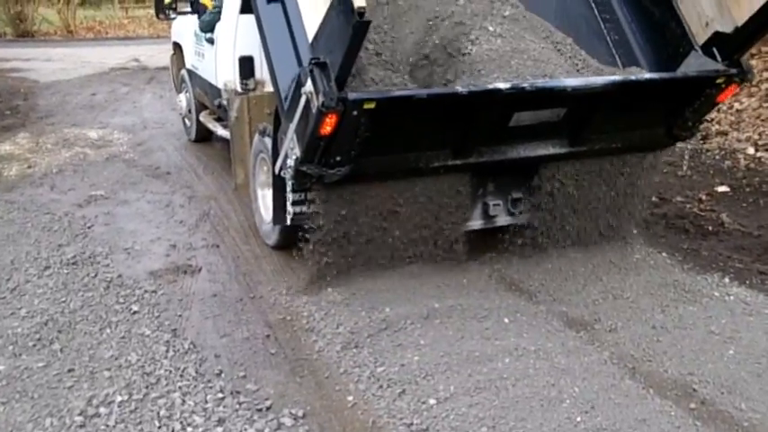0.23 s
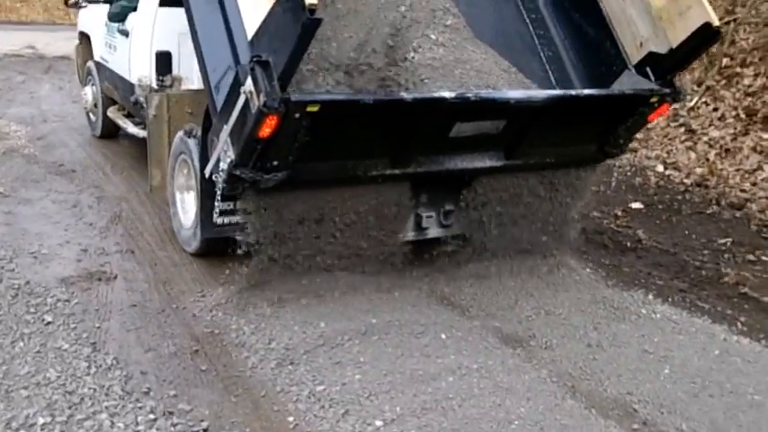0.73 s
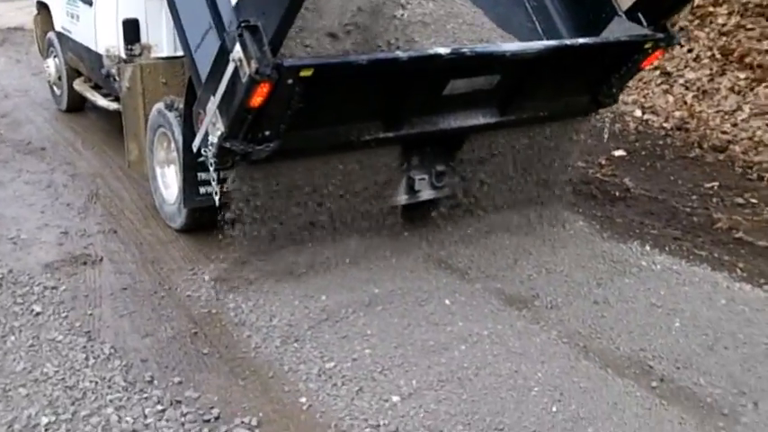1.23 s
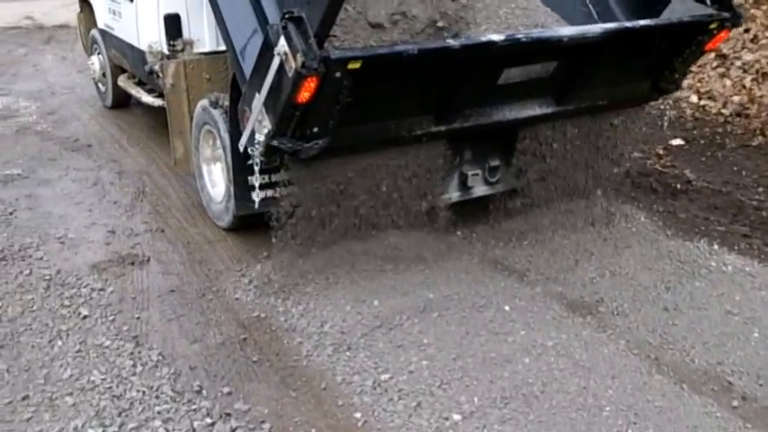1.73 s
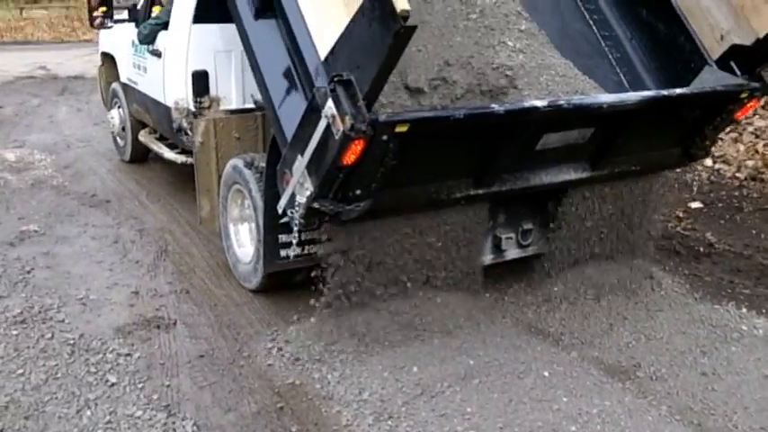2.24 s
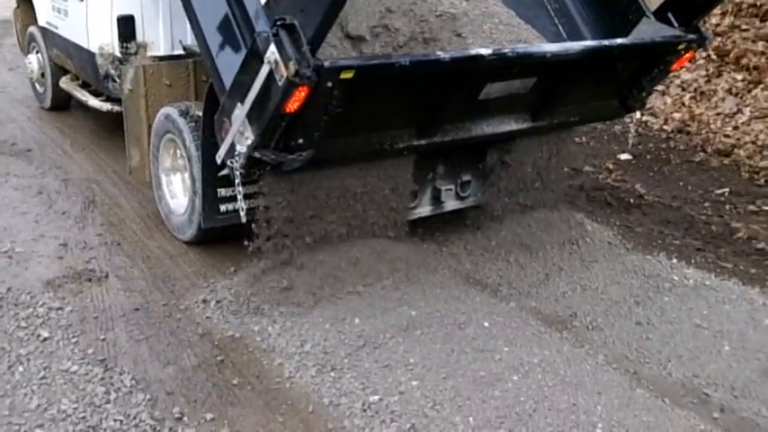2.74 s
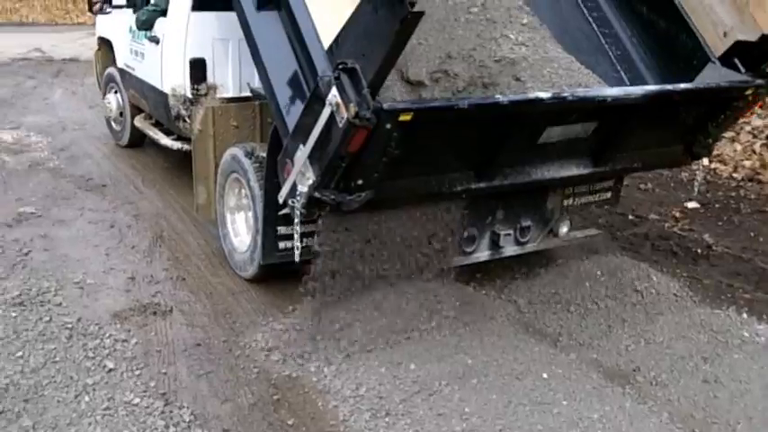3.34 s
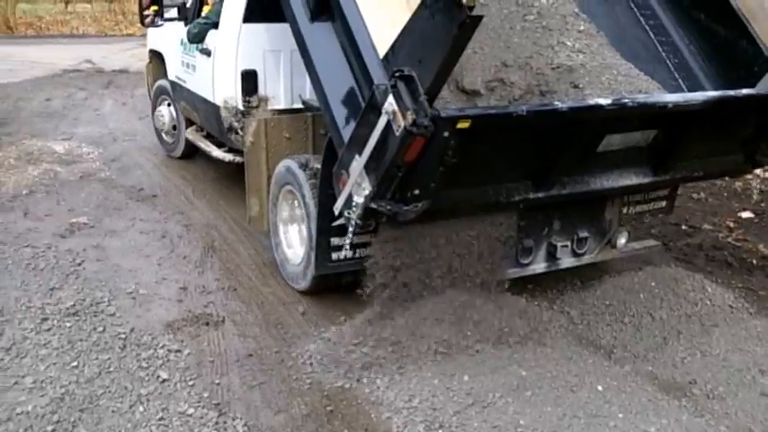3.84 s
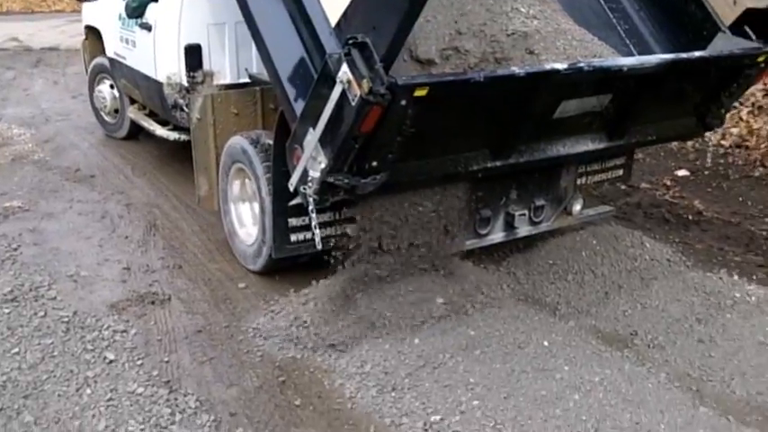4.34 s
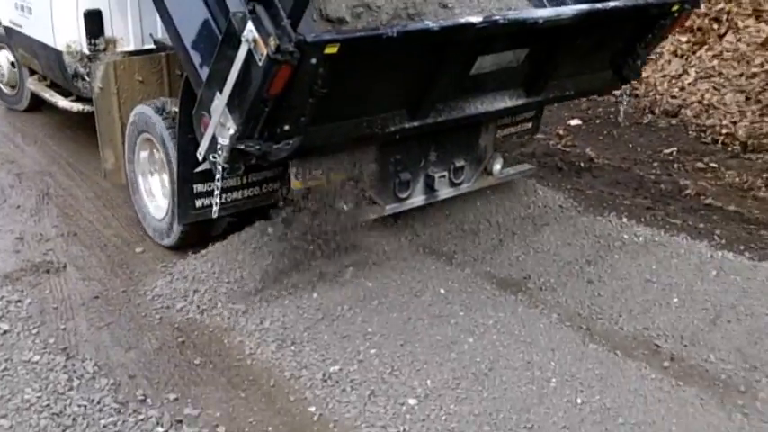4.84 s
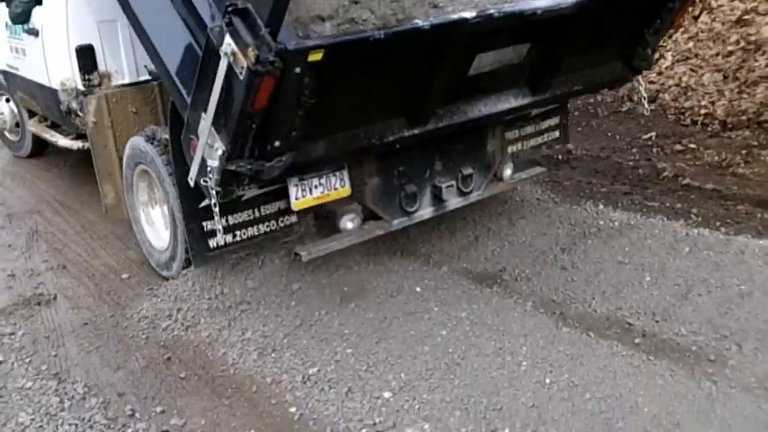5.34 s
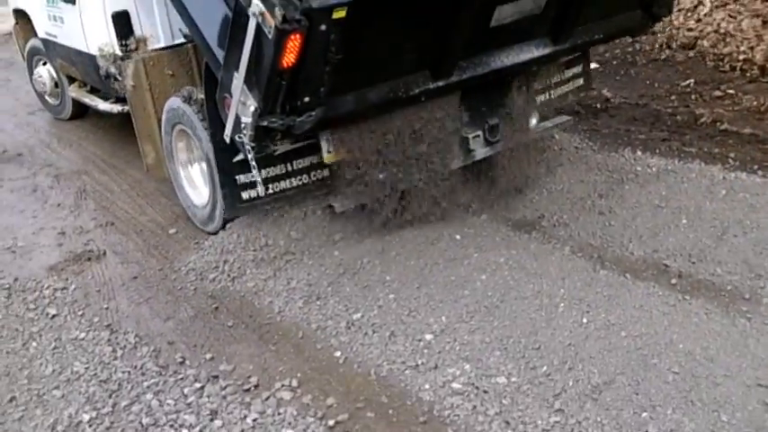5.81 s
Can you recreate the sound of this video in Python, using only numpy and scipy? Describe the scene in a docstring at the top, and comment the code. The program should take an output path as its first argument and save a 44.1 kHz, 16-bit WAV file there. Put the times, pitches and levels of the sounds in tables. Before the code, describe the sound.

A steady bright rush of gravel, full of ticks and knocks, runs over a quiet, throbbing truck engine in the open. The rush gradually weakens; the engine swells once, eases, then swells higher. Steel clanks and hollow clonks join a faint high squeal. After a brief near-lull with dull earthy thumps, a burst of coarse stone strikes the hitch plate and clatters on. The microphone is a few metres away, with barely any echo.

```python
"""Crushed stone clatters out from under a dump truck's tailgate, a few metres away outdoors.
The flow thins, then a last load breaks loose; random contacts ring short modes over a hiss of grit.
Behind it a V8 idles, then revs twice to creep forward: harmonics of the engine cycle and puffs of noise.
A thin squeal of wavering sine partials comes up; steel parts clank as sums of damped sines."""
import sys
import numpy as np
from scipy import signal
from scipy.fft import rfft, irfft, next_fast_len
from scipy.io import wavfile

SR = 44100
rng = np.random.default_rng(int(sys.argv[2]) if len(sys.argv) > 2 else 0)


def to_wav(sig):
    """Store sig (one row per channel, or 1-D mono) as 16-bit WAV at the path in sys.argv[1].

    Samples outside -1..1 are clipped; the rate is SR.
    """
    pcm = np.clip(np.atleast_2d(sig), -1, 1) * 32767
    pcm = np.round(pcm).astype(np.int16)
    wavfile.write(sys.argv[1], SR, pcm.T)  # frames by channels


N = 267687

# stone running under the tailgate: t/s, flow level/dB
STONE_FLOW = [(0, 0.6), (1.9, -0.6), (2.6, -2.1), (3.1, -4), (4.13, -3.5), (4.3, -3), (4.55, -5), (4.8, -4),
              (5.2, -7.5), (5.45, -11.5), (5.54, -0.5), (5.85, -6), (6.07, -1.5)]
# modes of the steel tailgate: f/Hz, width/Hz, relative level/dB
TAILGATE_MODES = [(330, 40, -21), (1490, 17, -4), (2104, 42, -2), (2602, 39, 4.5), (3107, 42, -2.5)]


def from_db(db):
    """Decibels to gain."""
    return 10 ** (np.asarray(db) / 20)


def rms_one(x):
    """Scale to unit power."""
    return x / np.sqrt(np.mean(x ** 2) + 1e-20)


def in_time(rows):
    """Each column of a curve at every sample."""
    s, *columns = np.transpose(rows)
    return [np.interp(np.arange(N) / SR, s, c) for c in columns]


def at_hz(points, hz):
    """Read a spectrum on a log-frequency axis."""
    f, db = np.transpose(points)
    return np.interp(np.log(np.maximum(hz, 1)), np.log(f), db)


def drift(rate):
    """Slow random wander with spread 1: low-passed noise, made at 1/40 of the sample rate."""
    step, settle = 40, 2000
    r = np.exp(-2 * step * np.pi * rate / SR)
    noise = rng.standard_normal(N // step + settle + 2)
    slow = rms_one(signal.lfilter([1], [1, -2 * r, r * r], noise)[settle:])
    return np.interp(np.arange(N) / step, np.arange(len(slow)), slow)


def colour(x, spectrum):
    """Causal (minimum-phase) filter with the given spectrum, by folding its cepstrum."""
    size = 2 * next_fast_len(len(x))
    gain = from_db(at_hz(spectrum, np.fft.rfftfreq(size, 1 / SR)))
    cepstrum = irfft(np.log(gain))
    cepstrum[1:size // 2] *= 2
    cepstrum[size // 2 + 1:] = 0
    return irfft(rfft(x, size) * np.exp(rfft(cepstrum)))[:len(x)]


def resonate(x, hz, width):
    """One resonance with gain 1 at its top."""
    r = np.exp(-np.pi * width / SR)
    zeros = np.array([1, 0, -1]) * (1 - r * r) / 2
    poles = [1, -2 * r * np.cos(2 * np.pi * hz / SR), r * r]
    return signal.lfilter(zeros, poles, x + 1e-18)


def impacts(per_s, spread_db, largest=6.2):
    """Random clicks: a positive spread makes a few large ones, a negative spread a few small ones."""
    born = np.flatnonzero(rng.random(N) < per_s / SR)
    sizes = rng.exponential(1, len(born))
    signs = rng.choice([-1, 1], len(born))
    clicks = np.zeros(N)
    clicks[born] = signs * from_db(spread_db * np.minimum(sizes, largest))
    return clicks


def engine(boom_db=0.0, idle_rumble_db=3.5, revved_rumble_db=0.0, flutter=0.17, throb=0.85):
    """Firing tone and side tones shift balance with speed; a turbulent growl grows with speed and load."""
    # engine speed: t/s, firings per s
    speed = [(0, 35.6), (2.25, 35.9), (2.74, 37.2), (2.94, 39.3), (3.13, 43), (3.3, 49.5), (3.57, 60.8),
             (3.68, 61), (3.9, 55.3), (4.05, 54.3), (4.35, 56.3), (4.5, 64), (4.63, 73.8), (4.8, 79.3),
             (4.9, 81), (5.06, 77.2), (5.26, 64), (5.58, 53.6), (6.07, 53.7)]
    # engine load, heard as the boom of the firing tone: t/s, level/dB
    load = [(0, -42.5), (2.2, -38), (2.95, -34.5), (3.33, -33.5), (3.44, -30.5), (3.7, -27.5), (4.0, -32.5),
            (4.5, -24.5), (4.62, -29.5), (4.95, -30), (5.22, -32.5), (5.37, -30.5), (5.56, -35), (5.7, -33),
            (6.07, -34.5)]
    # the two banks fire unevenly, so harmonics of the engine cycle flank the firing tone
    # multiple of the cycle: idling level/dB, creeping level/dB, revved level/dB, all at the usual load
    exhaust_tones = {"3": (-62, -50, -47), "5": (-50.5, -40.5, -36), "6": (-64, -57, -54),
                     "7": (-50.5, -51.5, -56), "9": (-60, -60, -43), "10": (-59, -64, -46),
                     "11": (-46.5, -57, -35), "13": (-46.5, -40, -51), "14": (-52, -53, -48),
                     "16": (-43, -48, -39), "19": (-47, -61, -46), "20": (-52, -60, -52),
                     "21": (-40.5, -47, -48), "24": (-47, -50, -55), "29": (-62, -54, -59)}
    # speeds of those three states: firings per s
    state_speeds = (36, 57, 74)
    # colour of the exhaust turbulence: f/Hz, level/dB
    rumble_colour = [(20, -64), (50, -36), (100, -15), (130, -2), (175, 3), (235, -2.5), (290, -5.5),
                     (380, -20.5), (600, -21.5), (1500, -97.5)]
    cylinders = 8
    usual_load_db, tones_follow_load = -34.5, 0.75
    silencer_hz, silencer_width_hz = 126, 12.4
    pipe_hz, pipe_width_hz, pipe_db = 174.5, 23, -1.5
    # reference point of the growl, before the rumble trim
    idle_firings, idle_load_db, idle_growl_db = 38.3, -41.5, -54.5
    growl_db_per_octave, growl_follows_load = 13.5, 0.22

    firings, = in_time(speed)
    boom, = in_time(load)
    angle = 2 * np.pi * np.cumsum(firings / cylinders) / SR
    tones = np.zeros(N)
    for name, levels in exhaust_tones.items():
        k = int(name)
        # overtones of the firing tone keep step with it, so that each puff has a steep front
        phase = 2 * np.pi * rng.random() * (k % cylinders != 0)
        level = from_db(np.interp(firings, state_speeds, levels))
        tones += level * (1 + flutter * drift(2.4)) * np.sin(k * angle + phase)
    # the silencer cancels a narrow band
    tones -= resonate(tones, silencer_hz, silencer_width_hz)
    tones *= from_db(tones_follow_load * (boom - usual_load_db))

    # turbulent gas leaves in puffs, one a firing, and rings the exhaust pipe
    puffs = rng.standard_normal((2, N)) * (1 + throb * np.cos(cylinders * angle))
    pipe = resonate(resonate(puffs[1], pipe_hz, pipe_width_hz), pipe_hz, 2 * pipe_width_hz)
    rumble = rms_one(colour(puffs[0], rumble_colour)) + from_db(pipe_db) * rms_one(pipe)
    growl_db = idle_growl_db + growl_db_per_octave * np.log2(firings / idle_firings)
    growl_db += growl_follows_load * (boom - idle_load_db)
    rumble_db = np.interp(firings, [firings.min(), firings.max()], [idle_rumble_db, revved_rumble_db])

    firing_tone = from_db(boom + boom_db) * np.sin(cylinders * angle)
    return np.sqrt(2) * (firing_tone + tones) + from_db(growl_db + rumble_db) * rumble


def squeal(swell_db=0.5, flicker_db=2.0, level_db=-0.5):
    """Thin metal squeal, perhaps a dragging brake: four voices swell in turn and waver."""
    # partials of each voice at full pitch: f/Hz, relative level/dB
    low = [(953.5, -55.5), (1324, -58.5), (1907, -49.5)]
    middle = [(2126, -41.5)]
    top = [(4252, -52.5), (6660, -66)]
    thin = [(5720, -57.5)]
    # each swell builds slowly, then dies fast: voice, loudest at t/s, relative level/dB, build/(dB per s)
    voice_swells = [("low", 2.9, -2.5, 0.83), ("low", 5.2, 2, 17), ("low", 5.12, 1, 3.1),
                    ("middle", 2.2, -9, 3.4), ("middle", 5.4, -1.8, 3), ("middle", 5.29, -4.5, 2.8),
                    ("top", 2.76, 0, 0.86), ("top", 4.1, -1, 3.9), ("top", 5.33, -0.5, 6.3),
                    ("thin", 2.7, -1, 2), ("thin", 4.26, -1, 6)]
    # pitch creeps up as the truck moves off and sags as it stops: t/s, share of full pitch
    pitch_curve = [(0, .993), (2.6, .994), (3.8, .999), (4.4, .998), (5, 1.001), (5.25, .999), (5.42, .991),
                   (6.07, .98)]
    release_db_per_s = 99
    pitch_wander = 0.00062  # share of full pitch

    out, t = np.zeros(N), np.arange(N) / SR
    for name, partials in (("low", low), ("middle", middle), ("top", top), ("thin", thin)):
        level = np.max([db - np.maximum(build * (s - t), release_db_per_s * (t - s))
                        for voice, s, db, build in voice_swells if voice == name], axis=0)
        pitch, = in_time(pitch_curve)
        clock = np.cumsum(pitch + pitch_wander * drift(26.3)) / SR
        for hz, db in partials:
            waver = swell_db * drift(4.5) + flicker_db * drift(9.8)
            out += from_db(level + db + waver) * np.sin(2 * np.pi * hz * clock)
    return from_db(level_db) * np.sqrt(2) * out


def yard(x, echo_db=-21.5):
    """Dull reflections from the ground and the truck body."""
    dull = signal.sosfilt(signal.butter(1, 4000, fs=SR, output="sos"), x)
    delays_s = (.0043, .0091, .017)
    echoes = sum(np.pad(dull, (int(s * SR), 0))[:N] for s in delays_s)
    return x + from_db(echo_db) * echoes


def clang(hits, modes, contact_s, uneven_db=-0.5):
    """Each blow sets every mode of a steel part ringing, with a strength of its own."""
    out, t = np.zeros(N + SR), np.arange(SR // 4) / SR
    for s, hit_db in hits:
        start = int(s * SR)
        for hz, width, db in modes:
            swing = np.sin(2 * np.pi * (hz * t + rng.random()))
            swing *= np.exp(-np.pi * width * t) * (1 - np.exp(-t / contact_s))
            level_db = hit_db + db + uneven_db * rng.standard_normal()
            out[start:start + len(t)] += from_db(level_db) * swing
    return out[:N]


def steelwork(gate_db=3.5, clonk_db=7.5, hitch_db=2.0):
    """Damped modes of struck steel: the gate clanks, something hollow clonks, the hitch plate rings."""
    # the hanging tailgate clanks against the stone: t/s, relative level/dB
    gate_hits = [(3.552, -34.5), (3.83, -44), (3.866, -36.5), (3.9145, -36), (3.948, -34), (3.995, -32),
                 (4.063, -37.5), (4.188, -42), (4.222, -50), (4.296, -36)]
    # hollow clonks, perhaps the gate's hinge: t/s, relative level/dB
    clonk_hits = [(4.107, -34), (4.157, -41), (4.287, -23), (4.37, -27), (4.409, -33)]
    # their one mode: f/Hz, width/Hz, relative level/dB
    clonk_modes = [(1170, 116, 0)]
    # the last load strikes the steel hitch plate: t/s, relative level/dB
    plate_hits = [(5.534, -28.5), (5.54, -29.5), (5.597, -53), (5.722, -36), (5.78, -32.5)]
    # modes of the hitch plate: f/Hz, width/Hz, relative level/dB
    plate_modes = [(1240, 28, 1), (1900, 47, 4.5), (2520, 60, 1.5), (2900, 56, -9), (3680, 30, -1),
                   (4090, 76, 7), (5100, 32, -3.5)]
    gate = clang(gate_hits, TAILGATE_MODES, contact_s=0.0015)
    clonks = clang(clonk_hits, clonk_modes, contact_s=0.0025)
    plate = clang(plate_hits, plate_modes, contact_s=0.00096)
    return from_db(gate_db) * gate + from_db(clonk_db) * clonks + from_db(hitch_db) * plate


def tailgate(hits, ring_db=2.5):
    """The loaded steel gate answers each hit with a damped ring."""
    ring = sum(from_db(db) * resonate(hits, hz, width) for hz, width, db in TAILGATE_MODES)
    return hits + from_db(ring_db) * ring


def clods(level_db=0.0, squash_s=0.0013, crumble_s=0.013):
    """A soft damp clod lands on the heap and crumbles: a short, dull burst of grains."""
    # clods thumping down: t/s, level/dB
    thumps = [(5.207, -34.5), (5.224, -39), (5.28, -41), (5.32, -29.5), (5.335, -35.5), (5.386, -37)]
    # their colour: f/Hz, relative level/dB
    thump_colour = [(120, -26), (280, 2), (430, -4.5), (600, 2), (800, -0.5), (1050, -10), (2000, -21),
                    (5000, -53)]
    t = np.arange(N) / SR
    bursts = sum(from_db(db) * np.clip((t - s) / squash_s, 0, 1) * np.exp(-np.abs(t - s) / crumble_s)
                 for s, db in thumps)
    grains = rng.standard_normal(N)
    return from_db(level_db) * colour(grains * bursts, thump_colour) / np.std(colour(grains, thump_colour))


def snaps(level_db=0.0, chips_db=-18.0, chips_s=0.0036):
    """Hard stone strikes stone squarely: one bright contact, then a short spray of chips."""
    # square hits: t/s, peak level/dB
    square_hits = [(2.7502, -18), (3.5052, -16), (3.528, -29), (4.6046, -16.5), (5.534, -17), (5.5947, -24)]
    # colour of a snap: f/Hz, relative level/dB
    snap_colour = [(600, -18), (2000, 0), (3800, 10), (5600, 2), (6800, -12), (7800, -25), (9000, -16.5),
                   (14000, -28)]
    out, t = np.zeros(N + SR), np.arange(SR // 16) / SR
    for s, db in square_hits:
        contact = t == 0
        chips = rng.standard_normal(len(t)) * np.exp(-t / chips_s)
        snap = colour(contact + from_db(chips_db) * chips, snap_colour)
        start = int(s * SR)
        out[start:start + len(t)] += from_db(db + level_db) * snap / np.max(np.abs(snap))
    return out[:N]


def struck(contacts, hz, sharpness=3.75, broad_db=-13, snap_power=7.0):
    """A few short modes around one pitch, plus the bare contact; high, hard hits have the most snap."""
    # how a struck stone or plate rings: multiple of its pitch, relative level/dB
    ring_modes = [(.56, 6), (1, 4), (1.22, 1), (1.65, -7)]
    # colour of stone on stone: f/Hz, level/dB
    stone_colour = [(300, -6.5), (700, -7.5), (1400, -4.5), (2700, 6), (4200, 11), (5600, 7.5), (6600, -7),
                    (7700, -34), (10000, -16), (15000, -64)]
    rings = sum((-1) ** k * from_db(db) * resonate(contacts, hz * ratio, hz * ratio / sharpness)
                for k, (ratio, db) in enumerate(ring_modes))
    dull = signal.butter(2, min(2 * hz, .45 * SR), fs=SR, output="sos")
    bare = from_db(broad_db) * (hz / 2700) ** snap_power * contacts
    return colour(signal.sosfilt(dull, rings) + bare, stone_colour)


def clusters(level_db=-5.0, length_s=0.022, uneven_db=4.0, count=14):
    """The stones of a handful land one after another within a moment."""
    # handfuls landing: t/s, relative level/dB, pitch f/Hz
    handfuls = [(0.193, -28.5, 2500), (0.322, -35, 3050), (0.491, -30, 3000), (0.637, -35, 3300),
                (0.721, -35, 2700), (1.097, -33, 2800), (1.208, -35, 3320), (1.28, -33, 2800),
                (1.313, -32, 2900), (1.365, -32, 2700), (1.423, -33, 2370), (1.504, -32, 3320),
                (1.554, -32.5, 2370), (1.85, -30.5, 2100), (2.2, -31, 2280), (2.227, -32, 2900),
                (2.347, -35.5, 2870), (2.553, -32, 2700), (2.708, -37, 2300), (2.879, -30, 2600),
                (3.345, -34, 2300), (3.556, -33, 2580), (3.94, -34, 2600), (4.002, -41, 2800),
                (4.222, -35.5, 3000), (4.298, -35, 2900), (4.665, -32.5, 3600), (4.707, -35.5, 3600),
                (4.81, -38, 3000), (4.922, -42, 3200), (5.541, -29.5, 3550), (5.599, -37.5, 4200),
                (5.664, -36, 3200), (5.684, -35, 3400), (5.774, -30, 3360), (5.795, -31, 2760),
                (5.868, -28.5, 1900), (5.885, -28, 1800)]
    out, size = np.zeros(N + SR), SR // 8
    for s, db, hz in handfuls:
        contacts = np.zeros(size)
        delays = length_s * (np.arange(count) + rng.random(count)) / count
        strengths = from_db(uneven_db * rng.standard_normal(count))
        contacts[(delays * SR).astype(int)] = rng.choice([-1, 1], count) * strengths
        rattle = struck(contacts, hz)
        # same energy as a steady sound of unit power lasting length_s
        rattle *= np.sqrt(length_s * SR / np.sum(rattle ** 2))
        start = int(s * SR)
        out[start:start + size] += from_db(db + level_db) * rattle
    return out[:N]


def strays(spread_db=3.5, spread_octaves=0.56):
    """Lesser stones at random moments, as strong as the flow; rows like those of the big ones."""
    per_s, typical_hz = 12, 2590
    stray_crack_db, stray_scatter_db = -27, -37  # at 0 dB flow, before the trims in knocks
    flow, = in_time(STONE_FLOW)
    rows = []
    for i in np.flatnonzero(rng.random(N) < per_s / SR):
        crack, spray, pitch = rng.uniform(-1.09, 1, 3)
        rows.append((i / SR, stray_crack_db + flow[i] + spread_db * crack,
                     typical_hz * 2 ** (spread_octaves * pitch),
                     stray_scatter_db + flow[i] + spread_db * spray))
    return rows


def knocks(crack_db=-3.0, crack_s=0.0021, scatter_db=-0.5, scatter_s=0.0083, build_s=0.0013,
           roughness_db=3.0):
    """A stone cracks against the heap or the steel and scatters smaller ones."""
    # the biggest stones landing: t/s, relative crack peak level/dB, pitch f/Hz, relative scatter level/dB
    big_stones = [(0.9622, -17.5, 3100, -33), (1.8903, -14, 2960, -33), (1.9775, -22, 2730, -26),
                  (1.9897, -21, 1740, -24), (2.7009, -9.5, 2480, -29.5), (3.2944, -26.5, 2590, -26.5),
                  (3.3223, -19, 3200, -43), (3.5504, -15, 2300, -31), (3.556, -30, 1200, -32),
                  (3.9482, -16, 2380, -37), (3.9952, -31, 2360, -28), (4.1874, -30, 2590, -31),
                  (4.2213, -27, 2590, -32), (4.4258, -22, 2120, -38), (4.6329, -33, 2230, -48),
                  (4.6798, -19, 3000, -43), (4.745, -22, 1380, -35), (4.778, -27, 1190, -35),
                  (5.295, -21, 2280, -30.5), (5.4525, -25.5, 2430, -50), (5.533, -29, 2140, -32),
                  (5.5398, -11, 2820, -28), (5.595, -11, 4770, -24.5), (5.598, -20, 2350, -35),
                  (5.672, -29, 2960, -33), (5.7215, -15.5, 4040, -38), (5.779, -29, 2280, -35)]
    out, t = np.zeros(N + SR), np.arange(SR // 8) / SR
    for s, peak_db, hz, spray_db in list(big_stones) + strays():
        contact, small_stones, sizes = rng.standard_normal((3, len(t)))
        crack = struck(contact * np.exp(-t / crack_s), hz)
        crack /= np.max(np.abs(crack))
        spray = rms_one(struck(small_stones * from_db(roughness_db * sizes), hz))
        spray *= np.exp(-t / scatter_s) - np.exp(-t / build_s)
        start = int(s * SR)
        out[start:start + len(t)] += from_db(peak_db + crack_db) * crack + from_db(spray_db + scatter_db) * spray
    return out[:N]


def surges():
    """Extra flow in dB: each slumping clump swells quickly, holds and drains away."""
    # clumps slump through the gap: t/s, swell level/dB
    slumps = [(1.869, 3.5), (2.201, 0.5), (3.281, 1), (3.55, 2), (4.215, 3.5), (4.262, 2), (4.3, 0.5),
              (4.437, 5), (4.611, 3.5), (4.669, 1.5), (4.75, 2.5), (5.285, 3), (5.527, 2), (5.585, 0),
              (5.662, 4), (5.772, 5), (5.865, 0.5), (6.03, 2)]
    rise_s, hold_s, fall_s = 0.0062, 0.026, 0.023
    t = np.arange(N) / SR
    total = np.zeros(N)
    for s, db in slumps:
        draining = np.maximum(t - s - rise_s - hold_s, 0)
        total += db * np.clip((t - s) / rise_s, 0, 1) * np.exp(-draining / fall_s)
    return total


def pour(heap_surge_share=0.25, grit_surge_share=0.29):
    """Levels in dB of the thudding, the coarse stones, the small stones and the grit; surges lift them all."""
    # dull thudding on the heap, before surges: t/s, relative level/dB
    thudding = [(0, -46), (1.8, -47), (2.5, -50.5), (3.2, -51), (4.5, -50.5), (4.8, -45), (5.3, -44.5),
                (5.45, -47.5), (5.7, -41), (6.07, -39)]
    # hiss of fine grit, which runs out first, before surges: t/s, level/dB
    grit_hiss = [(0, -53), (1.2, -54), (2.1, -54.5), (3.1, -57.5), (4.5, -58), (5.2, -63.5), (5.42, -76),
                 (5.55, -67), (5.85, -73.5), (5.97, -60.5)]
    coarse_db, small_db = -41, -37  # at 0 dB flow
    coarse_follows = 0.66  # share of the flow's swing
    last_load_s, last_load_coarse_db = 5.53, 6.5  # the last load is coarser

    flow, = in_time(STONE_FLOW)
    heap, = in_time(thudding)
    grit, = in_time(grit_hiss)
    surge = surges()
    coarser = last_load_coarse_db * (np.arange(N) / SR > last_load_s)
    return (heap + heap_surge_share * surge,
            coarse_db + coarse_follows * flow + coarser + surge,
            small_db + flow + surge,
            grit + grit_surge_share * surge)


def stones(hits, low_hz, high_hz, sharpness, count=20):
    """Each contact rings briefly at one of a row of pitches, dealt at random."""
    dealt = rng.integers(0, count, N)
    pitches = np.geomspace(low_hz, high_hz, count)
    return rms_one(sum(resonate(hits * (dealt == k), hz, hz / sharpness) for k, hz in enumerate(pitches)))


def on_steel(clatter):
    """Big surges spill onto the steel hitch plate, which adds a bright edge to the clatter."""
    plate_db, plate_hz, plate_width_hz = -9, 4640, 1100  # level at the biggest surge
    surge = surges()
    ring = resonate(clatter, plate_hz, plate_width_hz)
    return clatter + from_db(plate_db) * (surge / surge.max()) ** 2 * ring


def gravel(ticks_per_s=220, tick_spread_db=-4.0, ticks_db=-4.5, clump_db=2.0, heap_db=2.0):
    """Stone of all sizes lands in clumps; single near stones tick out of the rush and the heap thuds dully."""
    # colours of the four layers: f/Hz, level/dB
    heap_colour = [(150, 1.5), (350, -7), (500, 0.5), (650, 3.5), (900, -3.5), (1200, -7.5), (2000, -3.5),
                   (5000, -45)]
    coarse_colour = [(500, -19), (900, -9), (1300, 0), (1700, -4), (2100, -4.5), (2800, 1.5), (4000, 0.5),
                     (7000, -58.5)]
    clatter_colour = [(500, -17), (1400, -17.5), (2100, -1.5), (2700, 0.5), (3500, -0.5), (4500, -2.5),
                      (5600, -8), (6500, -15), (7200, -20), (7800, -46), (16000, -60)]
    grit_colour = [(5000, -81), (7900, -14), (8500, 2.5), (9200, 7), (10000, -0.5), (10700, 8), (12000, 1),
                   (12700, 6), (14000, -2), (15200, -11), (17000, -15)]
    heap, coarse, small, grit = pour()
    clumps = from_db(clump_db * drift(22))
    fines = rms_one(impacts(12000 * clumps, spread_db=2.5))
    ticks = from_db(ticks_db) * rms_one(impacts(ticks_per_s * clumps, tick_spread_db, largest=0.68))

    thuds = colour(impacts(3000 * clumps, spread_db=1.0), heap_colour)
    coarse_stones = stones(impacts(1800 * clumps, spread_db=-1.5), 867, 2620, sharpness=10.8)
    rattle = colour(coarse_stones + 1.1 * fines + ticks, coarse_colour)
    small_stones = stones(impacts(3000 * clumps, spread_db=2.0), 1904, 6770, sharpness=11.8)
    clatter = colour(small_stones + 1.3 * fines + 2 * ticks, clatter_colour)
    grains = rms_one(impacts(9000 * clumps, spread_db=3.0))
    hiss = colour(fines + 3.5 * grains, grit_colour)
    return (from_db(heap + heap_db) * rms_one(thuds) + from_db(coarse) * rms_one(rattle)
            + from_db(small) * on_steel(rms_one(clatter)) + from_db(grit) * rms_one(hiss))


def scene():
    """Truck and falling stone; the single hits also echo off the ground and the truck body."""
    hits = tailgate(knocks() + clusters()) + snaps() + steelwork()
    return (engine() + squeal() + clods() + yard(hits) + gravel())[None]


def record(dry):
    """The top is cut steeply above 15 kHz."""
    return signal.sosfilt(signal.ellip(10, .1, 80, 15000, fs=SR, output="sos"), dry)


dry = scene()
out = record(dry)
to_wav(out)
```